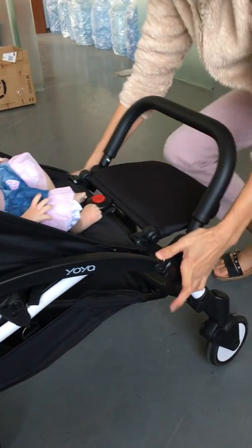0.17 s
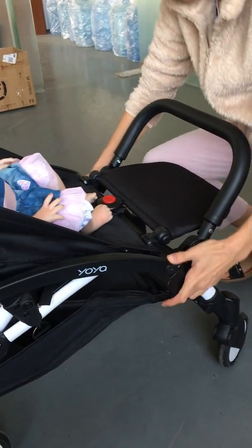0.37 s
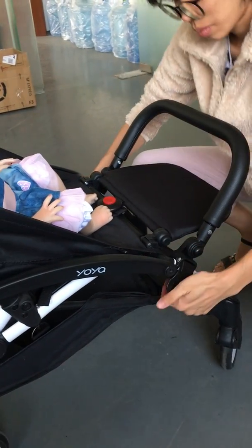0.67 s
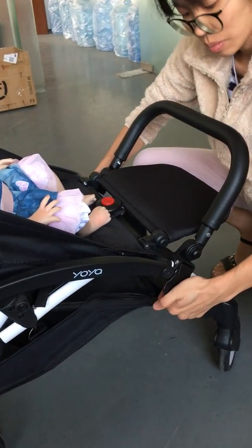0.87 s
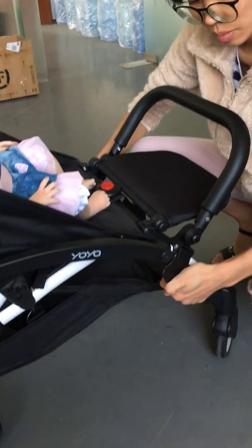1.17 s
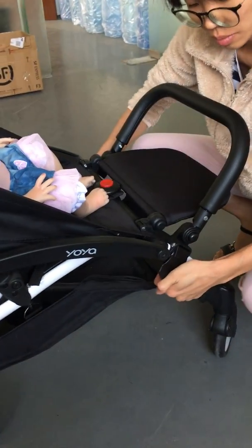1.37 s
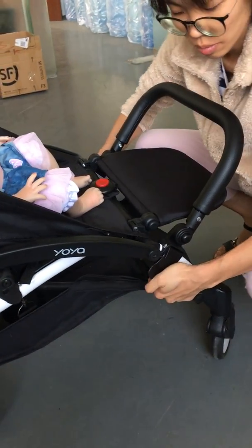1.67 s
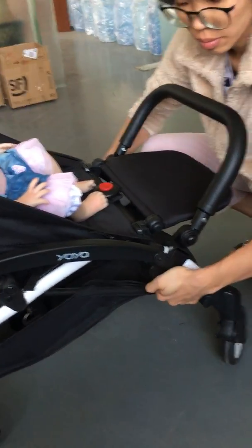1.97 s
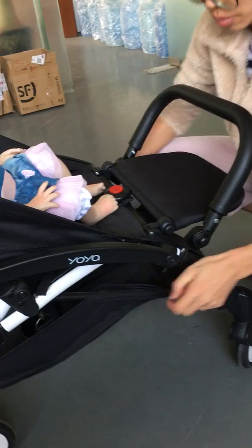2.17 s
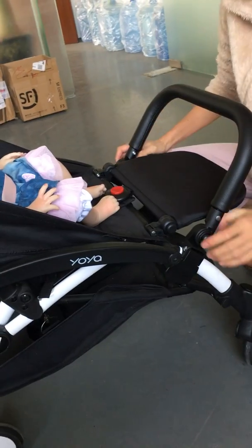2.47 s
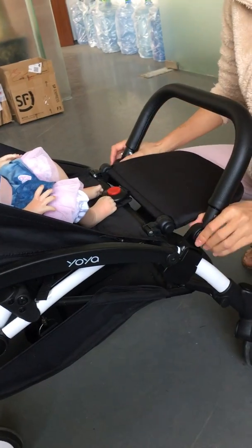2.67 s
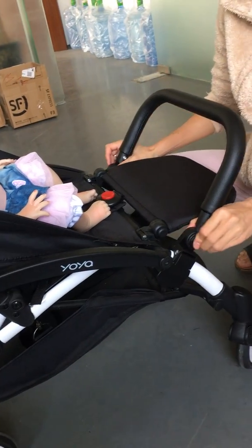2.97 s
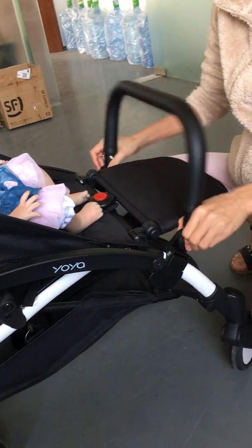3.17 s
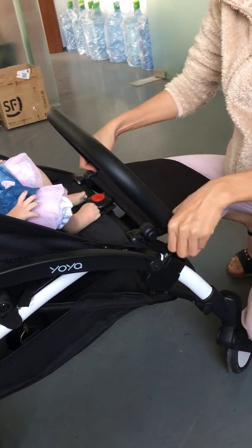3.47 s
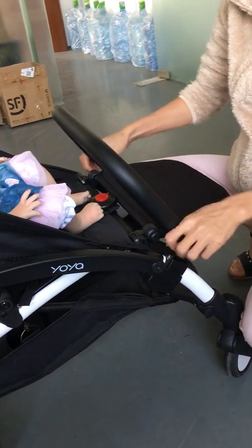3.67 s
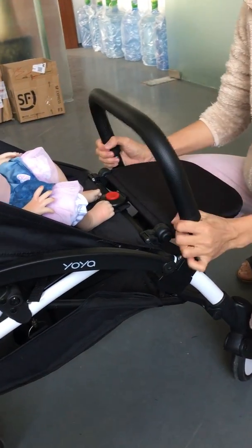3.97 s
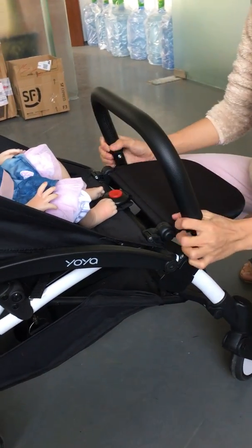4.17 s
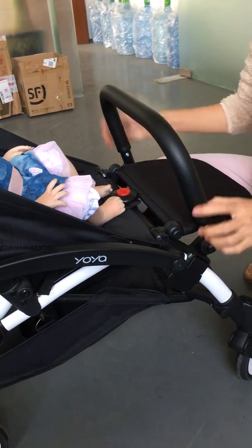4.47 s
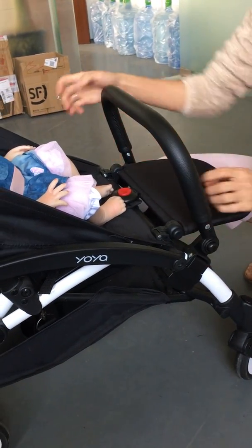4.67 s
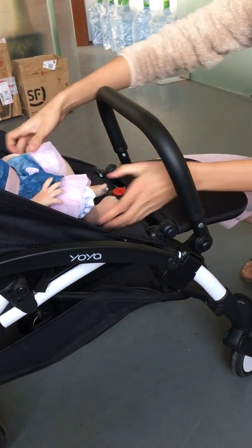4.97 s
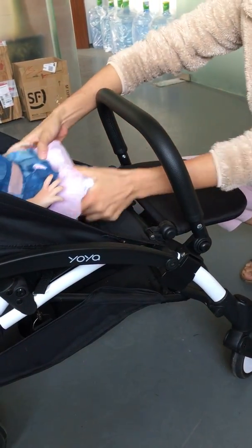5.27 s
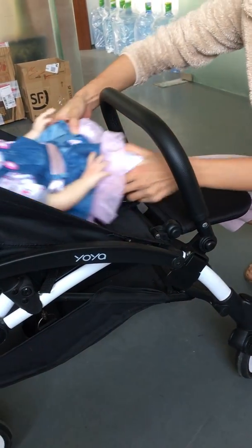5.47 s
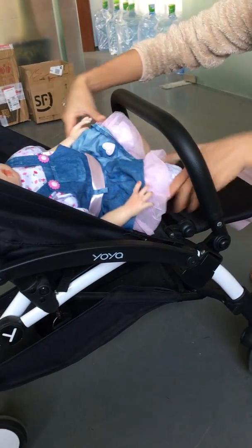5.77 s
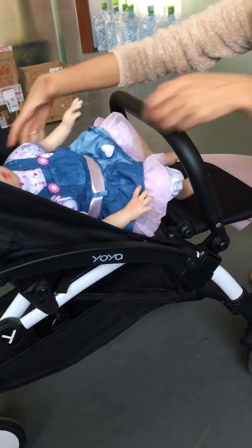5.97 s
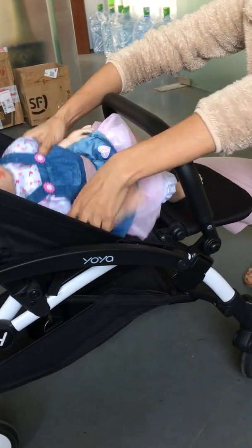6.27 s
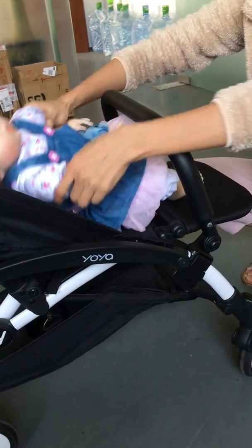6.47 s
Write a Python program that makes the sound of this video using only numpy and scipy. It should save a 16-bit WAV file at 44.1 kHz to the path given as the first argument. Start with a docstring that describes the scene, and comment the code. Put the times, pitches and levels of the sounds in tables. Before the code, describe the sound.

Close by in a hard-floored hall, a plastic bar snaps into its mounts on a stroller. One sharp snap comes first, then a quick cluster of louder snaps with dull knocks from the frame, and later another snap among small ticks. Sleeves and seat cloth rustle softly, and a small buckle clinks faintly near the end. Three long swishes, like a broom, come from far off over steady low room noise.

```python
"""In a hard-floored hall, close by, a plastic bumper bar is snapped into its mounts on a stroller.
Each snap is three contacts within milliseconds that excite the damped modes of a plastic part, and the
hall reverberates after it. The frame knocks on its wheels, a small buckle clinks, and sleeves and seat
cloth rustle by friction. Three long swishes, perhaps a broom, come from far off over steady room noise."""
import sys
import numpy as np
from scipy import signal
from scipy.fft import rfft, irfft, next_fast_len
from scipy.io import wavfile
from scipy.ndimage import uniform_filter1d

SR = 44100
rng = np.random.default_rng(int(sys.argv[2]) if len(sys.argv) > 2 else 0)


def file_out(sig):
    """Save sig as 16-bit WAV at sys.argv[1]."""
    # one column per channel
    cols = np.atleast_2d(sig).T
    # limit, then scale
    lim = np.clip(cols, -1, 1)
    pcm = np.round(lim * 32767).astype(np.int16)
    wavfile.write(sys.argv[1], SR, pcm)


N = 291501


def plastic_parts():
    """Free vibration: plastic is heavily damped, so its modes are broad and each contact is a click."""
    # modes of each part: f/Hz, bandwidth/Hz, relative level/dB
    hinge = [(630, 98, -8.5), (1030, 190, -9), (1266, 140, -6.5), (1720, 380, -8), (2340, 290, 0.5),
             (2800, 243, 2), (3150, 230, 0), (4200, 600, -6.5), (5400, 390, -5), (5540, 100, -0.5),
             (7000, 1500, -16.5), (9400, 1300, -29), (13400, 2100, -25.5)]
    catch = [(240, 47, 4), (588, 71, 4), (1070, 340, -5), (1590, 300, -4.5), (2350, 230, 2),
             (2970, 630, -2), (3600, 970, -5.5), (4360, 650, -10), (5320, 400, -3.5), (6120, 740, -11),
             (6760, 460, -7), (8700, 480, -8), (11700, 1100, -14)]
    latch = [(210, 170, -8), (650, 91, -2.5), (1000, 290, -5.5), (1570, 270, -8), (2507, 150, 4),
             (3025, 240, -2.5), (3070, 240, -2.5), (3920, 270, 0.5), (4480, 520, -6.5), (4950, 450, -11.5),
             (5460, 540, -6), (6300, 310, -5), (8340, 1200, -12.5), (9700, 320, -11), (14000, 1000, -30.5)]
    pivot = [(974, 190, -4), (2200, 500, -7.5), (2900, 460, -4.5), (3540, 330, -1.5), (4060, 450, -3.5),
             (5850, 620, -2), (7700, 790, -6.5), (8700, 550, -10.5)]
    peg = [(1360, 230, -0.5), (1750, 210, 1), (1920, 140, 3.5), (2270, 480, -3.5), (5570, 340, -4.5),
           (6170, 330, -4), (6440, 540, -9), (8900, 410, -9)]
    socket = [(258, 76, -8), (585, 120, -6.5), (1050, 140, 1.5), (1440, 144, 2), (1980, 520, 1.5),
              (2460, 235, 4), (2930, 250, -2.5), (4160, 820, -7), (5040, 400, -8.5), (6440, 370, -5.5),
              (7600, 510, -7), (8800, 500, -8), (13500, 3000, -24)]
    return (strike(hinge, contacts("hinge"), crack_db=-8.5, crack_s=0.0029)
            + strike(catch, contacts("catch"), crack_db=-6, crack_s=0.0027)
            + strike(latch, contacts("latch"), crack_db=-5.5, crack_s=0.0012)
            + strike(pivot, contacts("pivot"), crack_db=-7.5, crack_s=0.0025)
            + strike(peg, contacts("peg"), crack_db=-5.5, crack_s=0.003)
            + strike(socket, contacts("socket"), crack_db=-7.0, crack_s=0.0012))


def contacts(part, slip_db=-5.5, rebound_db_per_octave=-1):
    """Snap-through: a tooth slips off its ramp, strikes home and rebounds, duller. Loose parts tick."""
    # single contacts: t/s, part, level/dB, tilt/(dB/octave), hall send/dB
    ticks = [(.222, "hinge", -54, 8, 2), (.2785, "pivot", -52, -5.5, -7), (.609, "peg", -42.5, -7, -7.5),
             (.831, "catch", -55, 8, -5), (.837, "catch", -61, 4, -14), (1.025, "socket", -53.5, -12.5, -7),
             (1.149, "catch", -60.5, 10, -4), (1.7805, "latch", -27.5, -3, -6),
             (1.783, "catch", -39.5, -.5, 7.5), (1.933, "latch", -32, -4, -6),
             (3.668, "peg", -47.5, -1, -5), (3.6969, "peg", -36.5, 0.5, -2.5),
             (3.9307, "peg", -48.5, -1.5, 0.5), (3.945, "peg", -52.5, 1, -3),
             (4.04, "socket", -41.5, -5.5, -1), (4.062, "socket", -34, 4, -3),
             (4.1674, "socket", -42, 1, -18), (5.151, "catch", -54.5, -3.5, 3.5),
             (5.463, "buckle", -53, 8, -4), (5.515, "catch", -47.5, -2, 2.5),
             (5.532, "buckle", -57, -5, -3), (5.552, "buckle", -46.5, 0, -4),
             (5.556, "catch", -41.5, -2.5, -5), (6.394, "peg", -43.5, -13.5, -19),
             (6.399, "peg", -50.5, 4, -12)]
    # snaps: t/s, part, level/dB, tilt/(dB/octave), hall send/dB, contact gap/s, rebound/dB re the blow
    snaps = [(0.2284, "hinge", -42, 1, -8, 0.0022, -3), (0.3194, "hinge", -19, 1.5, -6, .0017, -3.5),
             (1.736, "catch", -22, 1, -1.5, 0.0021, -7), (1.925, "latch", -14.5, 0, -5, .002, -11.5),
             (3.4322, "pivot", -37.5, -2, -3.5, .0022, -8.5), (4.048, "socket", -22.5, 1.27, -3, .0014, -3)]
    hits = [(s, db, slope, send) for s, name, db, slope, send in ticks if name == part]
    for s, name, db, slope, send, gap, rebound_db in snaps:
        if name == part:
            hits += [(s - gap, db + slip_db, slope, send),
                     (s, db, slope, send),
                     (s + gap, db + rebound_db, slope + rebound_db_per_octave, send)]
    return hits


def strike(modes, hits, crack_db, crack_s, crack_hz=9000, burst_db=1.0, burst_s=0.011):
    """Modal superposition: each contact rings damped sinusoids and adds a crack of slipping edges."""
    t, out = np.arange(SR // 4) / SR, np.zeros(N)
    onset = SR // 200  # a hit's level is that of its first 5 ms
    ring = unit(sum((-1) ** k * amp(db) * width * np.exp(-np.pi * width * t) * np.sin(2 * np.pi * hz * t)
                    for k, (hz, width, db) in enumerate(modes)))
    soften = signal.butter(1, crack_hz, fs=SR, output="sos")
    for s, db, slope, send in hits:
        crack = signal.sosfilt(soften, rng.standard_normal(len(t)) * np.exp(-t / crack_s))
        # a longer burst of noise feeds the hall, so the crack's reverberation sounds even
        burst = signal.sosfilt(soften, rng.standard_normal(len(t)) * np.exp(-t / burst_s))
        direct = tilt(ring + amp(crack_db) * unit(crack), slope)
        direct = amp(db) * direct / np.std(direct[:onset])
        # the hall gathers sound from every face of the part, so single modes stand out less in it
        spread = unit(tilt(ring + amp(crack_db + burst_db) * unit(burst), slope)) * np.std(direct)
        add(out, s, direct)
        add(out, s, amp(send) * signal.fftconvolve(spread, hall()))
    return out


def tilt(x, db_per_octave, pivot_hz=2500, low_hz=700, high_hz=9000, radiate_hz=150):
    """A minimum-phase filter brightens or dulls a hit and keeps its attack sharp."""
    hz = abs(np.fft.fftfreq(len(x), 1 / SR))
    octaves = np.log2(np.clip(hz, low_hz, high_hz) / pivot_hz)
    log_gain = np.log(amp(db_per_octave * octaves))
    response = np.exp(np.conj(signal.hilbert(log_gain)))
    tilted = np.fft.ifft(np.fft.fft(x) * response).real
    # small parts radiate little bass
    return signal.sosfilt(signal.butter(2, radiate_hz, "highpass", fs=SR, output="sos"), tilted)


def frame(send_db=-7):
    """Damped oscillation: each jolt sets the frame swinging briefly on its wheels."""
    # dull knocks: t/s, level/dB, f/Hz, decay time/s
    thuds = [(1.305, -40.5, 58, 0.013), (1.739, -31, 247, 0.0063), (1.783, -34.5, 191, 0.014),
             (1.801, -31, 223, 0.0076), (1.809, -44.5, 55.3, 0.048), (1.924, -37, 190, 0.0098),
             (4.048, -51.5, 222, .014)]
    t, out = np.arange(SR // 3) / SR, np.zeros(N)
    for s, db, hz, decay in thuds:
        add(out, s, amp(db) * np.exp(-t / decay) * np.sin(2 * np.pi * hz * t))
    return out + amp(send_db) * signal.fftconvolve(out, hall())[:N]


def buckle():
    """Light damping: the buckle's high, narrow modes ring on as a clink."""
    # modes: f/Hz, bandwidth/Hz, relative level/dB
    modes = [(3570, 66, 1), (5060, 22, 2.5), (6200, 22, -3), (6390, 37, 6), (6700, 12, -4), (8958, 14, -7),
             (9900, 10, 1), (14200, 30, -10)]
    return strike(modes, contacts("buckle"), crack_db=-9, crack_s=0.0018)


def cloth(rest_crisp_db=-73, rest_dull_db=-66, clump_db=1.0, grain=0.39):
    """Stick-slip friction: fibres slip in clumps, a crisp rustle over a dull rub, rising with speed."""
    # strokes of hands and sleeves: middle t/s, half length/s, rustle level/dB, rub level/dB
    strokes = [(0.014, 0.18, -66, -67), (.7, 0.16, -67.5, -63), (1.233, 0.033, -65.5, -72),
               (1.614, 0.059, -63.5, -52), (1.75, 0.07, -57.5, -56.5), (2.252, 0.08, -57, -51.5),
               (2.41, 0.14, -64, -62), (3.562, 0.12, -67, -58.5), (3.805, 0.053, -59, -59.5),
               (5.142, 0.05, -59, -73), (5.302, 0.11, -66.5, -55.5), (5.576, 0.2, -55, -55.5),
               (6.28, 0.051, -51, -50.5), (6.415, 0.19, -62, -59)]
    # spectra of the rustle and the rub: f/Hz, relative level/dB
    rustle_spectrum = [(500, -22), (2000, 7), (4000, 4), (7000, 1), (10500, -3), (14000, -4), (16000, -9)]
    rub_spectrum = [(50, -21), (160, 1), (280, 1.5), (450, -2), (650, -0.5), (1200, 0.5), (2200, -9.5),
                    (5000, -26), (12000, -52)]
    t = np.arange(N) / SR
    crisp, dull = amp(rest_crisp_db), amp(rest_dull_db)  # cloth stirs faintly all the time
    for s, half, crisp_db, dull_db in strokes:
        speed = np.exp(-.5 * np.minimum(((t - s) / half) ** 2, 100))
        crisp = np.hypot(crisp, amp(crisp_db) * speed)
        dull = np.hypot(dull, amp(dull_db) * speed)
    clumps = amp(clump_db * unit(uniform_filter1d(rng.standard_normal(N), size=600)))
    slips = rng.standard_normal(N) * np.exp(grain * rng.standard_normal(N)) * clumps
    rub = rng.standard_normal(N) * clumps
    return colour(slips, rustle_spectrum) * crisp + colour(rub, rub_spectrum) * dull


def swishes(far_db=-3.0, tips_db=-13, scrape_lag_s=0.083):
    """Friction noise of far bristles arrives as reverberation; only the fizz of their tips is direct."""
    # sweeps: t/s, hiss length/s, relative hiss level/dB, scrape length/s, relative scrape level/dB
    sweeps = [(2.535, .24, -40.5, 0.27, -58.5), (4.32, 0.38, -43.5, 0.36, -53.5),
              (5.686, 0.5, -44.5, 0.19, -42)]
    # spectra of the bristles' hiss, low scrape and tip fizz: f/Hz, relative level/dB
    hiss_spectrum = [(200, -69), (900, -5.5), (1400, -9.5), (1900, -5.5), (2300, 4), (3200, 2.5),
                     (4200, -4), (4900, -9), (5800, -7.5), (9500, -16.5), (10500, -48.5), (16000, -32)]
    scrape_spectrum = [(60, -3), (130, 10), (280, 3.5), (430, 1), (620, 1.5), (1100, 1), (1600, -2),
                       (2600, -10), (6000, -28)]
    tip_spectrum = [(900, -24), (2300, -12), (3300, -11), (6000, 10.5), (10500, 3), (14000, -5),
                    (16000, -20)]
    hiss = colour(rng.standard_normal(N), hiss_spectrum)
    scrape = colour(rng.standard_normal(N), scrape_spectrum)
    speed, pressure = np.zeros(N), np.zeros(N)
    for s, hiss_s, hiss_db, scrape_s, scrape_db in sweeps:
        speed += amp(hiss_db) * swell(s, hiss_s, attack_s=0.22, fade_db_per_s=74)
        # the scrape sets in once the bristles bear down
        pressure += amp(scrape_db) * swell(s + scrape_lag_s, scrape_s, attack_s=0.15, fade_db_per_s=52)
    tips = amp(tips_db) * speed * colour(rng.standard_normal(N), tip_spectrum)
    return tips + amp(far_db) * signal.fftconvolve(hiss * speed + scrape * pressure, hall())[:N]


def swell(start, length, attack_s, fade_db_per_s):
    """Amplitude envelope of a sweep: a smooth rise, a hold until its length is over, exponential decay."""
    t = np.arange(N) / SR - start
    rise = np.sin(np.pi / 2 * np.clip(t / attack_s, 0, 1)) ** 2
    return rise * amp(-fade_db_per_s * np.clip(t - length, 0, 2))


def hall(length_s=1.2, early_db=4.0, early_s=0.049, build_up_s=0.0027, grain=0.47):
    """Reverberation along one path: lumpy early reflections, then a tail whose midrange lasts longest."""
    # reverberation time: f/Hz, T60/s
    t60 = [(150, 0.43), (500, 0.85), (1000, 0.93), (2500, 0.89), (4000, 0.83), (5600, 0.7361), (8000, 0.52),
           (11000, 0.55), (16000, 0.3)]
    # spectrum of the reflections: f/Hz, relative level/dB
    spectrum = [(150, 0.5), (600, 3), (1200, 4.5), (2500, 0.5), (5000, 2), (9000, 1.5), (12000, -4),
                (16000, -0.5)]
    t = np.arange(int(length_s * SR)) / SR
    reflections = rng.standard_normal(len(t)) * np.exp(grain * rng.standard_normal(len(t)))
    hz, frame_s, bands = signal.stft(reflections, SR, nperseg=256)
    fade = np.exp(-np.log(1000) * frame_s / read(t60, hz)[:, None])
    bands = bands * fade * amp(read(spectrum, hz))[:, None]
    tail = signal.istft(bands, SR, nperseg=256)[1][:len(t)]
    tail *= amp(early_db * np.exp(-t / early_s))
    tail *= 1 - np.exp(-(t / build_up_s) ** 2)
    return tail / np.linalg.norm(tail)


def air(level_db=-56):
    """Stationary noise: the hall's steady background, strongest in the bass."""
    # background spectrum: f/Hz, relative level/dB
    spectrum = [(20, -7), (35, -6), (52, 5), (75, 0.5), (130, -4.5), (280, -4.5), (430, -11), (630, -9),
                (1100, -14), (2000, -19.5), (4000, -31), (8000, -43), (16000, -54)]
    return amp(level_db) * colour(rng.standard_normal(N), spectrum)


def colour(x, spectrum):
    """Spectral shaping: filters a signal by a spectrum and scales it to rms 1."""
    size = next_fast_len(len(x), real=True)
    gain = amp(read(spectrum, np.fft.rfftfreq(size, 1 / SR)))
    return unit(irfft(rfft(x, size) * gain, size)[:len(x)])


def read(points, hz):
    """Interpolates a table on a log-frequency axis."""
    f, value = np.transpose(points)
    return np.interp(np.log(hz + 1), np.log(f), value)


def amp(db):
    """Converts decibels to an amplitude ratio."""
    return 10 ** (np.asarray(db) / 20)


def unit(x):
    """Normalises to rms 1."""
    return x / np.sqrt(np.mean(x ** 2) + 1e-20)


def add(mix, s, sound):
    """Superposes a sound on the mix at s seconds."""
    part = mix[max(round(s * SR), 0):][:len(sound)]
    part += sound[:len(part)]


def scene():
    """Linear superposition: the near stroller, far swishes and room noise sum in one channel."""
    return (plastic_parts() + buckle() + air() + frame() + cloth() + swishes())[None]


def record(dry, edge_hz=16200):
    """Band limiting: a linear-phase low-pass removes the highest treble."""
    lowpass = signal.firwin(255, edge_hz, window=("kaiser", 9), fs=SR)
    return signal.oaconvolve(dry, lowpass[None], "same")


dry = scene()
out = record(dry)
file_out(out)
```